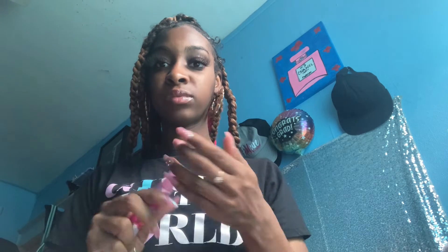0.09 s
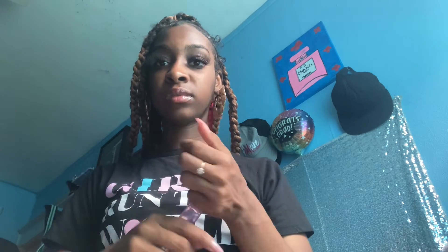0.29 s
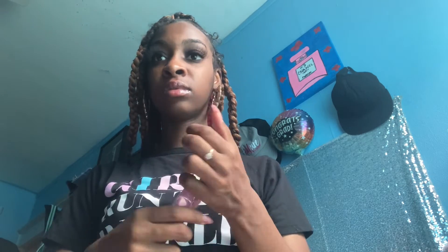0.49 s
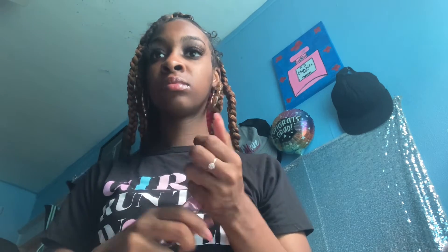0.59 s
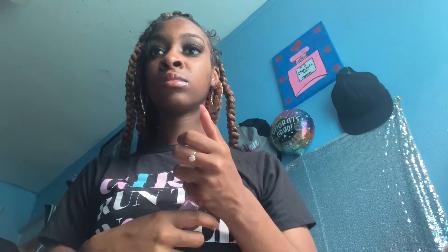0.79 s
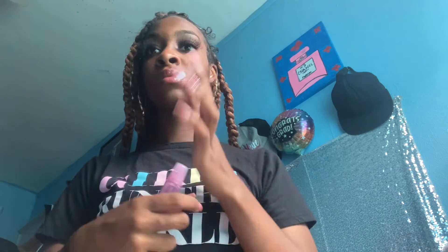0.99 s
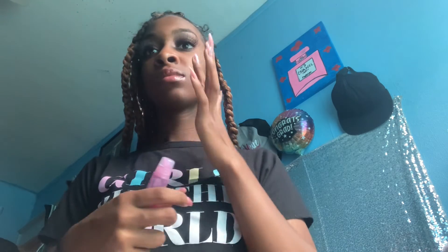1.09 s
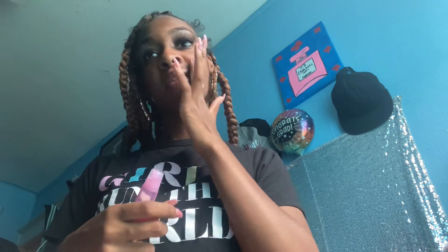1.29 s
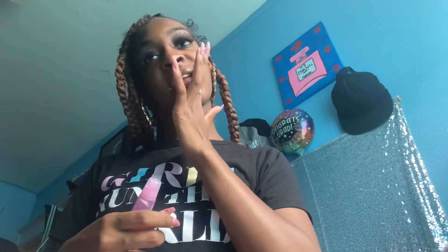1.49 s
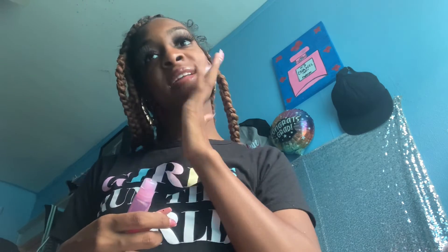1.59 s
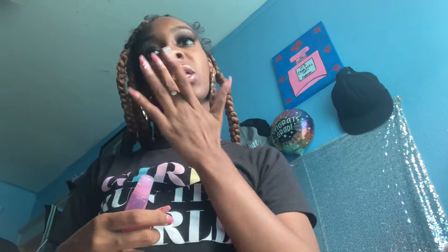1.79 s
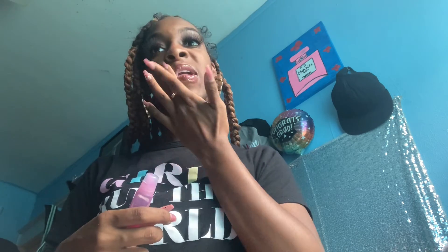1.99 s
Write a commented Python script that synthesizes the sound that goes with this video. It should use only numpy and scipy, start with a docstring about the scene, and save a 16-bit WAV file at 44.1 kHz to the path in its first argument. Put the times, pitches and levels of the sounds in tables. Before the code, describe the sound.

A keyring with metal and plastic trinkets is handled close to the microphone: a soft rustle, dry irregular clacks with brief rings and scraping, then faint ticks and soft hand movements over low hum in a small room.

```python
"""First come a low room hum, a soft rustle and a faint clink, as a hand starts to turn a keyring up close.
For about a second its metal and plastic trinkets clack, ring briefly and scrape, then settle.
A few faint ticks and two soft hand movements follow over the hum.
Clacks are short noisy knocks through damped resonances, rings are dying sine waves,
and scraping, rustle and hand are shaped noise; a small room adds echoes to the trinkets."""
import sys
import numpy as np
from scipy import signal
from scipy.fft import rfft, irfft
from scipy.io import wavfile
from scipy.ndimage import uniform_filter1d

SR = 44100
rng = np.random.default_rng(int(sys.argv[2]) if len(sys.argv) > 2 else 0)


def master(y):
    """Save y as 16-bit WAV."""
    cut = np.clip(np.atleast_2d(y).T, -1, 1)
    pcm = np.round(cut * 32767)  # scale
    wavfile.write(sys.argv[1], SR, pcm.astype(np.int16))


N = 88200  # length in samples: two seconds


def amp(db):
    """Turns decibels into a gain."""
    return 10 ** (np.asarray(db) / 20)


def unit(x):
    """Scales a sound to an average (rms) level of 1."""
    return x / np.sqrt(np.mean(x ** 2) + 1e-20)


def read(points, hz):
    """Reads a curve between its points, along a log-frequency axis."""
    f, value = np.transpose(points)
    return np.interp(np.log(hz + 1), np.log(f + 1), value)


def add(mix, s, sound):
    """Mixes a stereo sound in, starting at s seconds."""
    part = mix[:, max(round(s * SR), 0):][:, :sound.shape[1]]
    part += sound[:, :part.shape[1]]


def bins(size):
    """Gives the frequencies of a spectrum in Hz."""
    return np.fft.rfftfreq(size, 1 / SR)


def causal(db):
    """Makes a minimum-phase filter from a dB curve, so that nothing sounds before its cause."""
    log_gain = np.log(amp(np.concatenate([db, db[-2:0:-1]])))
    return np.exp(np.conj(signal.hilbert(log_gain)))[:len(db)]


def fade(t, t60):
    """Dies away by 60 dB in t60 seconds."""
    return np.exp(-np.log(1000) * t / t60)


# How alike left and right are. Each row: frequency in Hz, likeness from 0 to 1.
ROOM_SAME = [(60, 0.92), (700, 0.79), (2000, 0.6), (5500, .3), (9000, .75)]


def diffuse(pair, colour_db):
    """Colours two unrelated signals and makes them most alike in the bass, as in a room."""
    a, b = rfft(pair)
    same = read(ROOM_SAME, bins(N))
    right = same * a + np.sqrt(1 - same ** 2) * b
    return irfft(np.array([a, right]) * causal(colour_db), N)


def noise(colour):
    """Stereo noise of a given colour, scaled to rms 1."""
    return unit(diffuse(rng.standard_normal((2, N)), read(colour, bins(N))))


# Colour of the room air. Each row: frequency in Hz, relative level in dB.
FLOOR = [(12, -50), (25, -26.5), (45, -3.5), (80, -5.5), (120, -7.5), (200, -12.5), (260, -5), (330, -16.5),
         (400, -13), (640, -22.5), (1200, -24), (2100, -29.5), (4500, -33), (6700, -37.5), (8500, -31),
         (10200, -33), (11400, -44), (12800, -33.5), (15000, -34.5), (16000, -48)]
FLOOR_DB = -72
# Steady hum tones. Each row: frequency in Hz, level in dB.
HUM = [(59.2, -77.5), (264, -84)]


def background():
    """Quiet room air is coloured noise; the hum is a few steady sine waves."""
    t = np.arange(N) / SR
    hum = sum(amp(db) * np.sqrt(2) * np.sin(2 * np.pi * (hz * t + rng.random())) for hz, db in HUM)
    return amp(FLOOR_DB) * noise(FLOOR) + hum


# Dull rustle of handling. Each row: time in seconds, level in dB.
RUSTLE = [(0, -75.5), (.07, -67), (.13, -70), (.2, -67), (.27, -65), (.36, -86), (.5, -95)]
# Colour of the rustle. Each row: frequency in Hz, relative level in dB.
RUSTLE_COLOUR = [(30, -24), (70, -4), (130, -3), (200, -3.5), (400, 1.5), (620, -2.5), (900, -10.5),
                 (1400, -24.5), (4000, -54.5)]


def rustle():
    """Soft handling noise, as the bunch starts to move: dull noise that swells and fades."""
    level_db = np.interp(np.arange(N) / SR, *np.transpose(RUSTLE))
    return amp(level_db) * noise(RUSTLE_COLOUR)


# Soft hand movements. Each row: start in seconds, attack in seconds, decay in seconds,
# then the levels of thud, pat and swish in dB.
HAND = [(1.383, 0.0062, 0.016, -84, -49, -80), (1.418, .005, 0.02, -59, -63, -97),
        (1.781, 0.0028, 0.019, -62, -62.5, -54), (1.808, .005, 0.04, -64, -78, -76)]
# Colours of those three parts. Each row: frequency in Hz, relative level in dB.
THUD = [(20, -28), (60, 2.5), (160, 2), (280, -14.5), (600, -52.5), (2000, -56)]
PAT = [(40, -31), (150, -12), (280, -0.5), (420, 2), (570, -13), (780, -12.5), (1100, -27.5), (1500, -33),
       (5000, -68)]
SWISH = [(100, -29), (500, -3.5), (1100, 3), (1700, 1), (2400, -7), (4000, -9), (6500, -30), (9000, -13.5),
         (11300, -38), (13500, -12), (16000, -26)]


def hand():
    """A hand pats and brushes skin and cloth: dull puffs of noise that rise fast and die away."""
    t, out = np.arange(N) / SR, np.zeros((2, N))
    parts = [noise(THUD), noise(PAT), noise(SWISH)]
    for s, attack, decay, *levels_db in HAND:
        rise = np.clip((t - s) / attack, 0, 1)
        fall = np.exp(-np.maximum(t - s - attack, 0) / decay)
        out += rise * fall * sum(amp(db) * part for db, part in zip(levels_db, parts))
    return out


# Light sliding that rings narrow resonances. Each row: start in seconds, length in seconds,
# start pitch in Hz, end pitch in Hz, width in Hz, level in dB.
SLIDES = [(0.158, 0.043, 587, 550, 20, -70), (1.066, .11, 660, 610, 53, -70.5),
          (1.083, 0.12, 1930, 1727, 150, -68.5), (1.078, 0.092, 2420, 2150, 100, -81),
          (1.147, 0.0315, 1470, 1255, 69, -68), (1.081, 0.066, 1250, 1290, 83, -73.5),
          (1.228, 0.06, 785, 750, 40, -76), (1.27, 0.1, 761, 720, 70, -84)]


def slides(size=8192):
    """Friction in narrow resonances that drift in pitch, swelling and fading."""
    t, out = np.arange(size) / SR, np.zeros((2, N))
    for s, length, start_hz, end_hz, width_hz, db in SLIDES:
        progress = np.clip(t / length, 0, 1)
        pole = np.exp(-2 * np.pi * width_hz / SR)
        rough = rng.standard_normal(size) + 1j * rng.standard_normal(size)
        drive = signal.lfilter([1], np.poly([pole, pole]), rough)
        pitch = start_hz + (end_hz - start_hz) * progress
        tone = (drive * np.exp(2j * np.pi * np.cumsum(pitch) / SR)).real
        swell = np.sqrt(progress * (1 - progress))
        # the level holds over the slide itself, not over the silence behind it
        tone = amp(db) * np.sqrt(length * SR / size) * unit(tone * swell)
        add(out, s, np.array([tone, tone]))
    return out


# Faint ticks. Each row: start in seconds, level in dB.
TICKS = [(1.3595, -57), (1.609, -51.5)]
# Tones inside every tick. Each row: frequency in Hz, relative level in dB, time to fade by 60 dB in seconds.
TICK_MODES = [(1500, -15, .02), (1815, -9, .014), (2320, -5, .008), (4200, 0, .006), (4750, -2, .006)]


def ticks():
    """Single light taps on hard plastic: a handful of very short tones."""
    t, out = np.arange(SR // 10) / SR, np.zeros((2, N))
    tick = sum(amp(db) * fade(t, t60) * np.sin(2 * np.pi * (hz * t + rng.random()))
               for hz, db, t60 in TICK_MODES)
    for s, db in TICKS:
        add(out, s, amp(db) * np.array([tick, tick]))
    return out


def ring(hz, t60, attack, size=8000):
    """One dying tone (a mode), equal on both sides."""
    t = np.arange(size) / SR
    wave = np.sin(2 * np.pi * (hz * t + rng.random()))
    mode = np.minimum(t / attack, 1) * fade(t, t60) * wave
    return np.array([mode, mode])


def rings(table, attack):
    """Plays a table of single dying tones."""
    out = np.zeros((2, N))
    for s, hz, db, t60 in table:
        add(out, s, amp(db) * ring(hz, t60, attack))
    return out


# Dull thumps. Each row: start in seconds, frequency in Hz, level in dB, time to fade by 60 dB in seconds.
THUMPS = [(1.385, 350, -44.5, .06), (1.401, 160, -44, .07), (1.81, 90, -51, .09), (1.872, 75, -55, .15)]
THUMP_ATTACK_S = .004


def thumps():
    """Dull thumps of the hand that ring low, each a soft-starting tone."""
    return rings(THUMPS, THUMP_ATTACK_S)


PATCHY_DB, PATCH_HZ, PATCH_S = 2.5, 500, .012  # strength and size of the patches


def patchy(x):
    """The colour of the scraping shifts as surfaces meet: random patches of time and frequency."""
    z = signal.stft(x, SR, nperseg=256)[2]
    field = rng.standard_normal(z.shape[1:])
    for axis, width in enumerate([PATCH_HZ * 256 / SR, PATCH_S * SR / 128]):
        field = uniform_filter1d(field, max(round(width), 1), axis)
    return signal.istft(z * amp(PATCHY_DB * unit(field)), SR, nperseg=256)[1][:, :N]


# Damped resonances of the bunch held in the hand. Each row: frequency in Hz, relative level in dB.
BODY = [(25, -56.5), (80, -36.5), (200, -27.5), (330, -18), (600, -5.5), (920, 4), (1130, -3), (1400, -8.5),
        (1700, 3), (2030, -1), (2380, 3), (2800, -7), (3400, -8.5), (4300, -4.5), (5100, -4.5), (5900, -9),
        (7000, -8.5), (8200, -6.5), (9150, -2.5), (10400, -7), (11300, -14), (12300, -9), (13200, -7),
        (15000, -12), (16500, -27)]
# Trinkets sliding over each other. Each row: time in seconds, level of the body in dB,
# level of the treble in dB, both before the trims below.
SCRAPE = [(0, -68, -62), (.04, -62.5, -78), (.08, -85, -93), (.15, -77, -83), (.19, -61.5, -68),
          (.26, -58, -53), (.31, -61.5, -67), (.36, -55, -51.5), (.41, -52.5, -59.5), (.46, -56, -58.5),
          (.51, -67.5, -68), (.54, -66.5, -70), (.575, -49, -52), (.62, -46, -56), (.66, -56, -60.5),
          (.70, -58.5, -50.5), (.74, -51, -61.5), (.82, -51, -58), (.86, -71.5, -74), (.94, -46.5, -56.5),
          (1.0, -71, -71.5), (1.06, -71, -68), (1.11, -68.5, -79.5), (1.17, -68, -76.5), (1.2, -82, -105),
          (1.3, -88, -98), (1.4, -100, -105)]
GRAINS_PER_S, GRAIN_SPREAD_DB = 1500, 3.5
TREBLE_HZ = 3350  # where body gives way to treble
HISS_DB, SCRAPE_TRIM_DB = -1.5, -2.5  # trim of the treble, trim of both


def scrape():
    """Tiny random slips between the trinkets excite the body of the bunch."""
    hz, t = bins(N), np.arange(N) / SR
    slip_db = GRAIN_SPREAD_DB * np.minimum(rng.exponential(1, N), 2)
    slips = (rng.random(N) < GRAINS_PER_S / SR) * amp(slip_db)
    slips = patchy(slips * rng.choice([-1, 1], (2, N)))
    s, body_db, treble_db = np.transpose(SCRAPE)
    low = 1 / (1 + (hz / TREBLE_HZ) ** 6)
    out = np.zeros((2, N))
    for db, share in [(body_db, low), (treble_db + HISS_DB, 1 - low)]:
        colour_db = read(BODY, hz) + 10 * np.log10(share + 1e-6)
        out += amp(np.interp(t, s, db)) * unit(diffuse(slips, colour_db))
    return amp(SCRAPE_TRIM_DB) * out


JINGLE_LOW_HZ, JINGLE_HIGH_HZ = 3400, 15000
PING_ATTACK_S = .0003


def tinkle(t60):
    """A small metal piece of random pitch, as loud as the body of the bunch lets it be."""
    hz = JINGLE_LOW_HZ * (JINGLE_HIGH_HZ / JINGLE_LOW_HZ) ** rng.random()
    return amp(read(BODY, hz)) * ring(hz, t60, PING_ATTACK_S, size=2000)


JINGLES_PER_S, JINGLE_T60_S, JINGLE_SPREAD_DB = 600, .017, 3
JINGLE_DB = -5  # relative to the treble column of SCRAPE


def jingles():
    """Tiny links tinkle at random, as loudly as the trinkets slide."""
    t, out = np.arange(N) / SR, np.zeros((2, N))
    for s in t[rng.random(N) < JINGLES_PER_S / SR]:
        size_db = JINGLE_SPREAD_DB * min(rng.exponential(), 3)
        add(out, s, amp(size_db) * tinkle(JINGLE_T60_S))
    s, _, treble_db = np.transpose(SCRAPE)
    return unit(out) * amp(JINGLE_DB + np.interp(t, s, treble_db))


# Pieces struck hard. Each row: start in seconds, frequency in Hz, level in dB,
# time to fade by 60 dB in seconds.
PINGS = [(.2216, 1850, -32, .016), (.2216, 5115, -44, .09), (.2317, 1900, -34, .018),
         (.3296, 1700, -39, .02), (.567, 2290, -37, .035), (.5738, 1680, -43, .06), (.5895, 610, -38, .04),
         (.5895, 2400, -43, .035), (.6061, 760, -39, .025), (.6061, 1125, -48, .12),
         (.6061, 1723, -46, .07), (.761, 870, -37, .04), (.7899, 2295, -24.5, .035),
         (.7899, 5170, -37, .06), (.7899, 9020, -37, .05), (.9203, 580, -45, .07), (.9233, 1125, -42, .09),
         (.9233, 1740, -44, .06)]


def pings():
    """Pieces that ring out at a pitch of their own when struck hard."""
    return rings(PINGS, PING_ATTACK_S)


# Borders in Hz of the four bands of a contact: knock, clack, tick and sparkle.
BAND_EDGES_HZ = [300, 1300, 3200, 7000, 16000]
LEVEL_WINDOW_S = .004  # the energy of a contact counts as spread over this time
CHATTER_S, CHATTER_DB = 0.0013, 4.5  # decay time, and level relative to the first impulse
CHATTER_SHARED = 0.86  # part of the chatter that both sides hear alike
COLOUR_DB = 2.5  # each contact strikes another spot of the bunch
BASS_HZ, BASS_FOLLOW = 280, 0.45  # dull knocks reach deeper than bright clacks


def contact(levels_db, size=1024):
    """An impulse that buzzes for an instant after it lands, through the damped body of the bunch."""
    hz, t = bins(size), np.arange(size) / SR
    chatter = rng.standard_normal((3, size)) * np.exp(-t / CHATTER_S)
    chatter = rfft(chatter / np.linalg.norm(chatter, axis=1)[:, None])
    both_sides = np.sqrt(CHATTER_SHARED) * chatter[0]
    each_side = np.sqrt(1 - CHATTER_SHARED) * chatter[1:]
    blow = 1 + amp(CHATTER_DB) * (both_sides + each_side)
    lo, hi = np.array(BAND_EDGES_HZ[:-1]), np.array(BAND_EDGES_HZ[1:])
    spots = np.geomspace(lo[0], hi[-1], 36)
    spot_db = COLOUR_DB * rng.standard_normal(len(spots))
    colour_db = read(BODY, hz) + read(np.c_[spots, spot_db], hz)
    inside = (hz >= lo[:, None]) & (hz < hi[:, None])
    centres = np.r_[BASS_HZ, np.sqrt(lo * hi)]
    for _ in range(2):  # two rounds bring each band close to its level
        energy = (abs(blow * amp(colour_db)) ** 2).sum(0)
        power = inside @ energy / (size * LEVEL_WINDOW_S * SR)
        lift = levels_db - 10 * np.log10(power)
        bass = lift[0] + BASS_FOLLOW * (lift[0] - lift[1])
        colour_db = colour_db + read(np.c_[centres, np.r_[bass, lift]], hz)
    return irfft(blow * causal(colour_db)) * np.cos(np.pi / 2 * t / t[-1])


# Trinket contacts. Each row: start in seconds, levels of knock, clack, tick and sparkle in dB,
# then the metal ring in dB relative to the contact.
CLINKS = [ (.0129, -66, -59.5, -64.5, -70, 8), (0.1734, -60, -53, -58, -58, 0.5),
          (.2110, -61, -42.5, -60, -61.5, 6), (.2157, -54, -45, -49, -48, 14),
          (.2214, -48, -38, -52, -49.5, -7), (0.2315, -47, -42, -52, -42.5, -0.5),
          (.2714, -55, -54, -85, -61, 7), (0.2948, -64, -53, -83, -66, 15),
          (0.328, -64, -46, -65, -54, 5.5), (0.3296, -49, -42.5, -58.5, -48.5, -10),
          (0.345, -60, -49, -61, -52.5, -1), (0.3578, -50.5, -42, -55, -59, 9.5),
          (0.364, -61.5, -52, -58.5, -52.5, -2.5), (.3730, -60.5, -53.5, -57, -51.5, 6),
          (.3784, -52.5, -53, -49.5, -47, -4.5), (0.4168, -54, -51.5, -55.5, -64, 3),
          (.4287, -59.5, -45, -54, -54, 0.5), (0.4334, -46, -43.5, -50, -48.5, 2.5),
          (0.4427, -60.5, -52.5, -49.5, -51, 1.5), (.4478, -58, -57, -57, -55.5, 0),
          (.4630, -61, -56.5, -59, -56, 3), (0.4723, -56.5, -55.5, -59, -54.5, 1.5),
          (.5168, -57, -59.5, -71, -64, 3), (0.5486, -53, -48, -48, -44.5, 8.5),
          (0.5669, -54, -48, -52.5, -48.5, 4), (0.5736, -58, -45, -49, -47.5, 2.5),
          (.5830, -61.5, -48, -55.5, -42, -1), (0.5893, -40, -45, -55, -54.5, 0),
          (0.6036, -48.5, -51, -51, -43, 2.5), (0.6061, -39, -44.5, -46, -48.5, -3),
          (.6659, -60, -57, -62.5, -61, 0), (.6807, -63.5, -63, -60, -52, 0),
          (0.6907, -64.5, -47.5, -47, -54, 0.5), (.6960, -61, -50, -54.5, -48, -0.5),
          (0.7062, -60, -58, -54, -47, -1.5), (0.7271, -49.5, -47.5, -55, -55.5, 1.5),
          (.7334, -46, -53, -60.5, -62.5, 1), (0.7427, -46.5, -55.5, -58, -55.5, 4),
          (0.7608, -38.5, -42.5, -55, -48, 1), (0.7813, -57.5, -45, -52, -54.5, -3),
          (0.7898, -42.5, -31, -34, -26.5, 2.5), (0.8113, -59, -48.5, -48, -37, -6.5),
          (0.8209, -62.5, -46.5, -53, -46.5, -4.5), (.8856, -63, -64.5, -68, -59, -21),
          (.9031, -54.5, -43, -48.5, -45.5, 4.5), (0.9201, -46, -40.5, -43.5, -36, -28),
          (0.9233, -44, -43, -56, -52, -16), (.9298, -46, -47, -66, -64, -10),
          (0.9575, -55.5, -67, -57, -54, -16), (.9760, -57, -54.5, -79, -64, 15),
          (0.9904, -53.5, -58, -75, -68, -10), (1.0215, -51, -47, -54, -49.5, -17),
          (1.0278, -53, -44, -75, -82, -15), (1.0497, -59, -63, -63, -58, -11),
          (1.0850, -62.5, -63, -60.5, -63, -3), (1.2135, -68, -65, -96, -85, -12),
          (1.226, -73, -61.5, -69.5, -67.5, -19)]
# Tones of the metal rings. Each row: frequency in Hz, level in dB relative to the contact, # time to fade by 60
# dB in seconds.
METAL = [(1124, -20.5, .2), (1990, -31.5, .18), (2288, -19, 0.098), (2476, -22, .14), (5125, -8.5, 0.043),
         (8965, -26.5, .17), (9075, -24, .15), (9480, -27.5, .15), (12860, -32.5, .15)]
RING_SCATTER_DB = 5  # the grip changes from contact to contact


def clinks(size=8000):
    """Each contact clacks and leaves metal tones ringing, each as strongly as the blow in its band."""
    out = np.zeros((2, N))
    hz, db, t60 = np.transpose(METAL)
    # spinning complex numbers that shrink: their real part is a dying tone
    modes = np.exp(np.outer(2j * np.pi * hz - np.log(1000) / t60, np.arange(size) / SR))
    band = np.searchsorted(BAND_EDGES_HZ, hz) - 1
    for s, *levels_db, ring_db in CLINKS:
        levels_db = np.array(levels_db)
        add(out, s, contact(levels_db))
        scatter_db = RING_SCATTER_DB * rng.standard_normal(len(hz))
        struck_db = levels_db[band] + db + ring_db + scatter_db
        turns = rng.random((1, len(hz)))  # random starting phases
        add(out, s, ((amp(struck_db) * np.exp(2j * np.pi * turns)) @ modes).real)
    return out


CHARM_COUNT, CHARM_T60_S = 7, .022
CHARM_DB = -9  # relative to the mean of the contact's tick and sparkle in dB


def charms():
    """Every contact shakes a few small charms, at ever different pitches."""
    out = np.zeros((2, N))
    for s, _, _, tick_db, sparkle_db, _ in CLINKS:
        level_db = (tick_db + sparkle_db) / 2 + CHARM_DB
        add(out, s, amp(level_db) * sum(tinkle(CHARM_T60_S) for _ in range(CHARM_COUNT)))
    return out


# How long the room rings. Each row: frequency in Hz, time to fade by 60 dB in seconds.
ROOM_T60 = [(150, 0.41), (700, .36), (2000, 0.13), (5000, .28), (10000, 0.26), (16000, 0.2)]
# How loud the room is. Each row: frequency in Hz, level in dB.
ROOM_LEVEL = [(150, -14.5), (700, -12), (2000, -10), (5000, -9), (10000, -17), (16000, -12)]
# Echoes from nearby surfaces. Each row: delay in seconds, level in dB.
ECHOES = [(.0018, -18), (.0038, -13.5), (0.0098, -16)]


def room(x):
    """A few close reflections and the short tail of a furnished room, made of fading noise."""
    t = np.arange(N) / SR
    taps = rng.standard_normal((2, N)) * np.clip((t - .003) / .005, 0, 1)
    hz, age, z = signal.stft(taps, SR, nperseg=256)
    t60 = read(ROOM_T60, hz)[:, None]
    # the square root evens out the energy of long and short tails
    z = z * fade(age, t60) * np.sqrt(2 * np.log(1000) / (t60 * SR))
    tail = signal.istft(z, SR, nperseg=256)[1][:, :N]
    tail = diffuse(tail, read(ROOM_LEVEL, bins(N)))
    out = x + signal.fftconvolve(x, tail, axes=1)[:, :N]
    for s, db in ECHOES:
        add(out, s, amp(db) * x)
    return out


# Balance of the sides. Each row: frequency in Hz, left above right in dB.
LEFT_RIGHT = [(100, -1.5), (400, 3.5), (1300, -2), (2400, -2), (4400, -1), (9000, -0.5), (15000, 0.5)]


def scene():
    """The keyring in its room, with sliding, rustle and hand close by, over the background."""
    tilt_db = read(LEFT_RIGHT, bins(N)) / 2
    struck = clinks() + charms() + pings() + thumps() + ticks()
    near = room(struck + scrape() + jingles()) + slides() + rustle() + hand()
    return irfft(rfft(near) * amp([tilt_db, -tilt_db]), N) + background()


# Delay of the right microphone port behind the left. Each row: frequency in Hz, delay in seconds.
PORT_LAG = [(300, .00015), (1300, .00004), (2100, 0), (3720, 0), (3750, .000262), (4500, .000215),
            (6000, .000207), (9400, .000218)]
CUTOFF_HZ = 16500


def record(dry):
    """The treble reaches the right port a little late; then the recorder's band limit."""
    hz = bins(N)
    late = np.exp(-2j * np.pi * hz * read(PORT_LAG, hz))
    right = irfft(rfft(dry[1]) * late, N)
    lowpass = signal.firwin(255, CUTOFF_HZ, window=("kaiser", 9), fs=SR)
    return signal.oaconvolve(np.array([dry[0], right]), lowpass[None], "same")


dry = scene()
out = record(dry)
master(out)
```